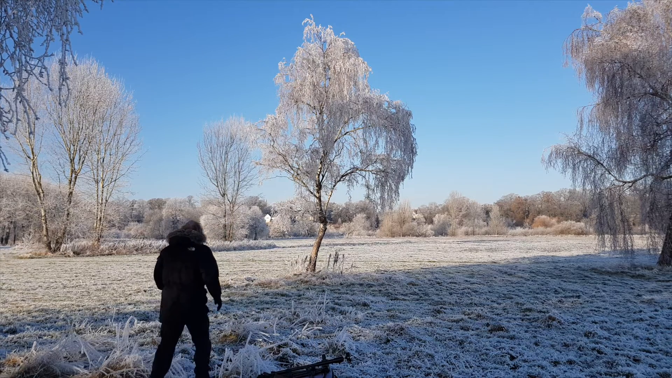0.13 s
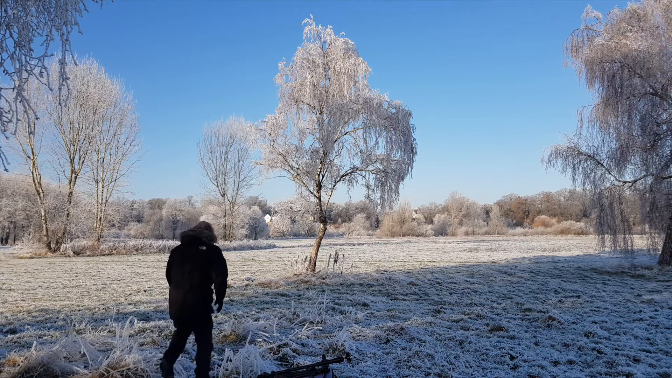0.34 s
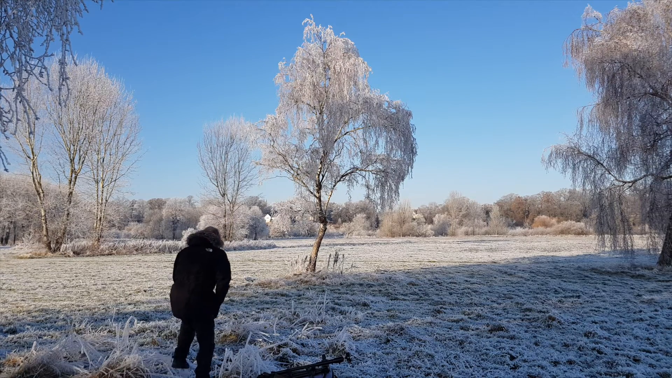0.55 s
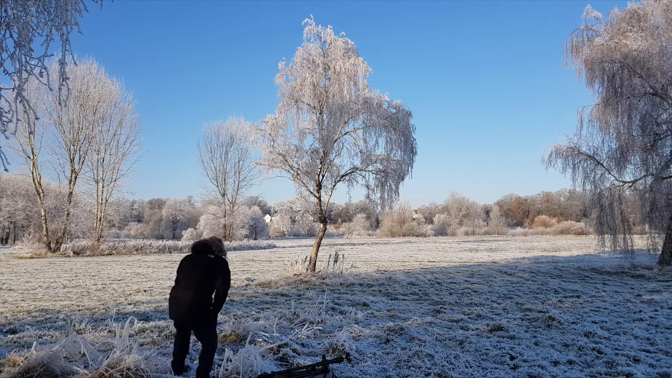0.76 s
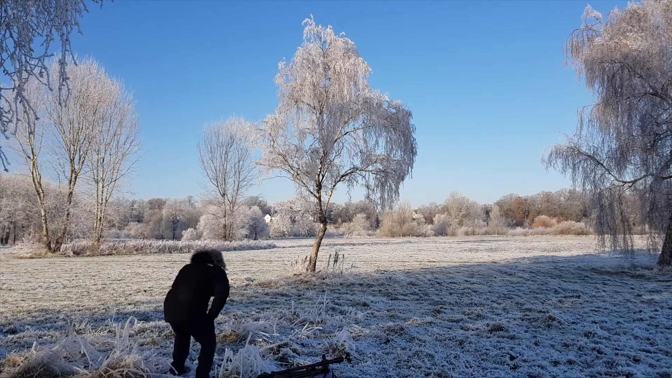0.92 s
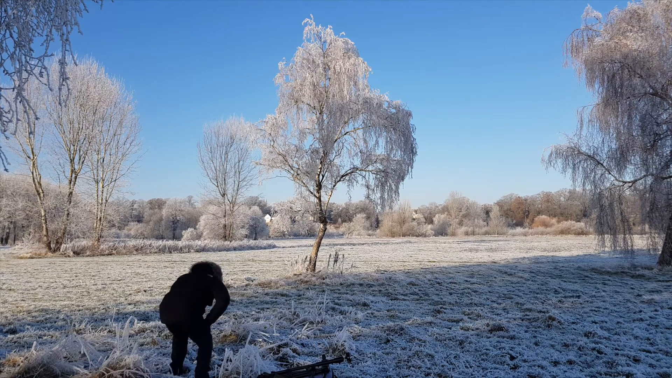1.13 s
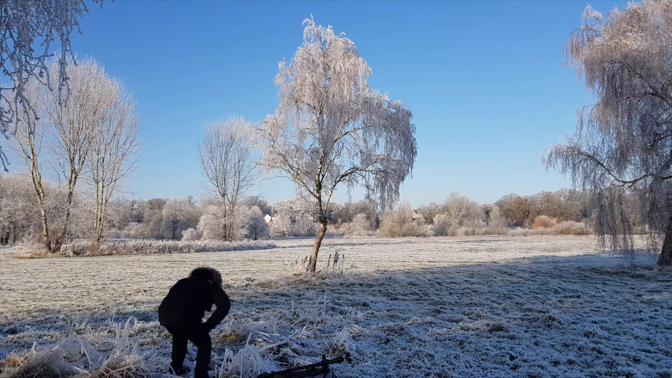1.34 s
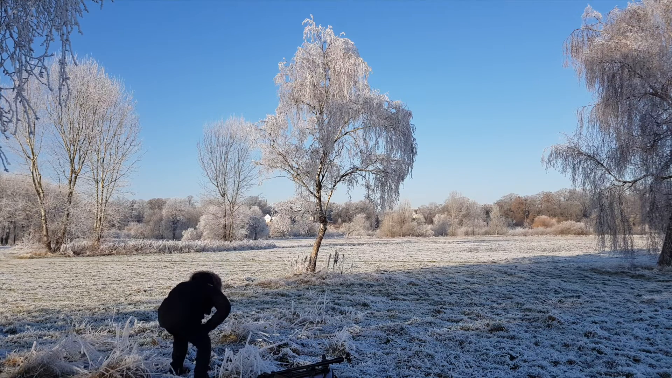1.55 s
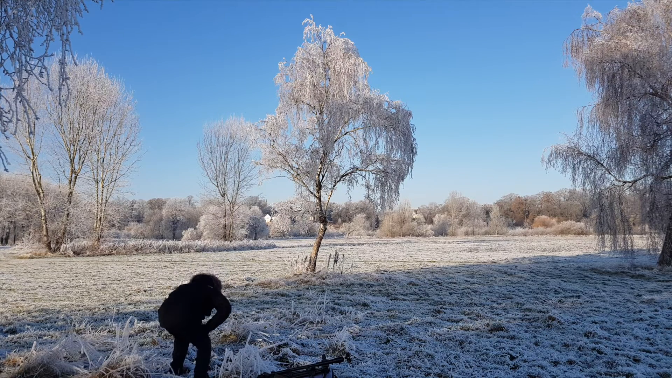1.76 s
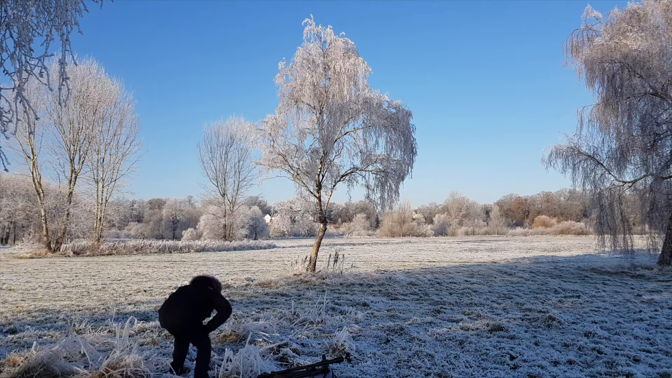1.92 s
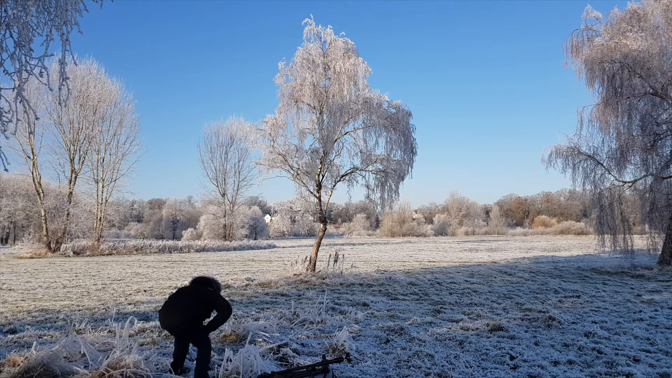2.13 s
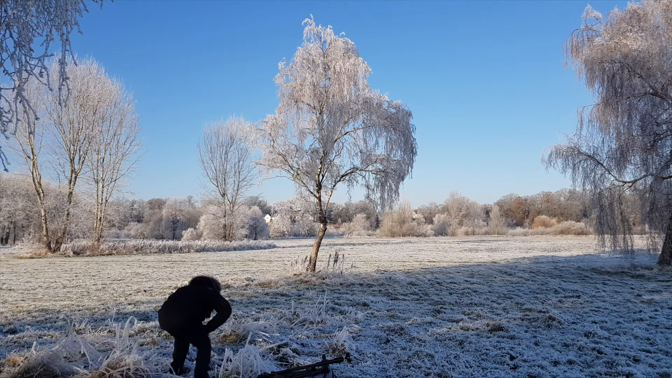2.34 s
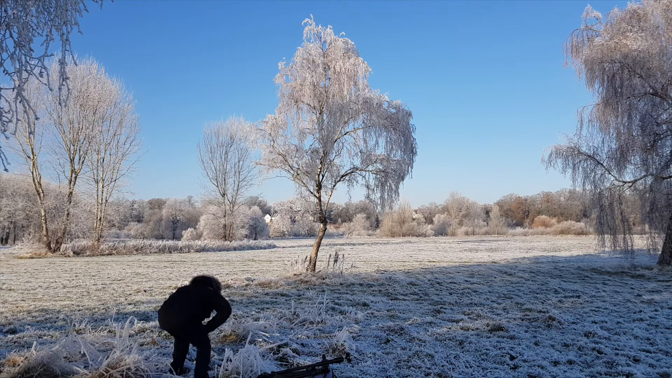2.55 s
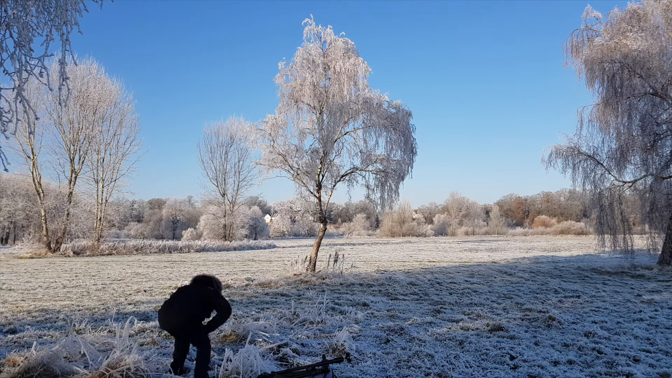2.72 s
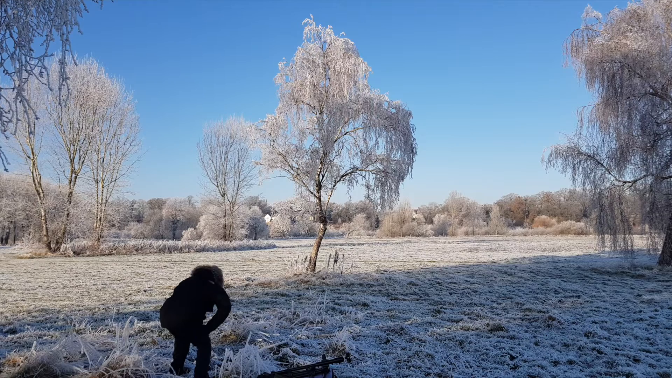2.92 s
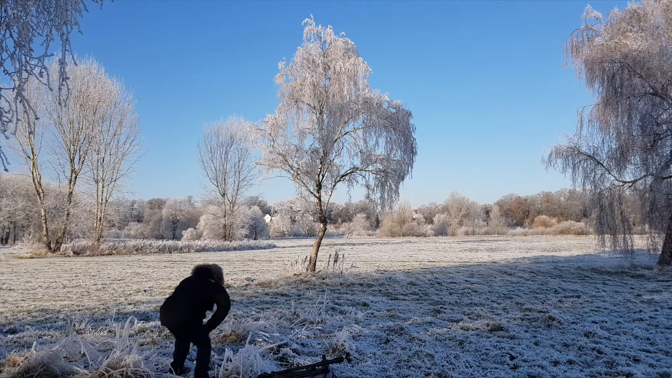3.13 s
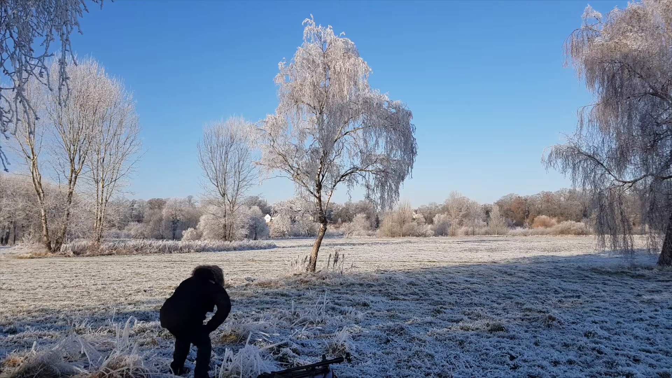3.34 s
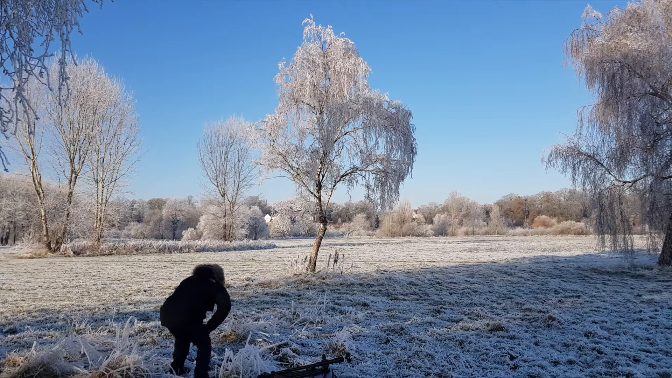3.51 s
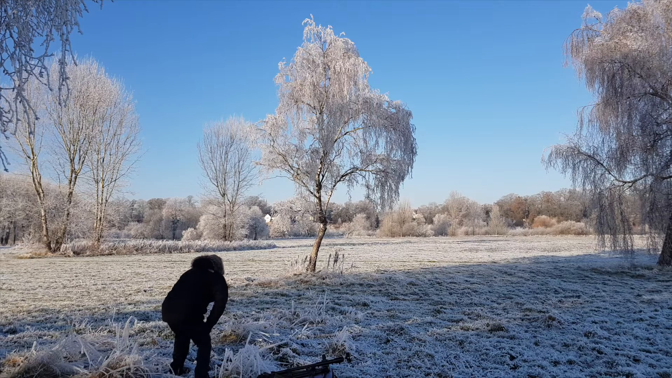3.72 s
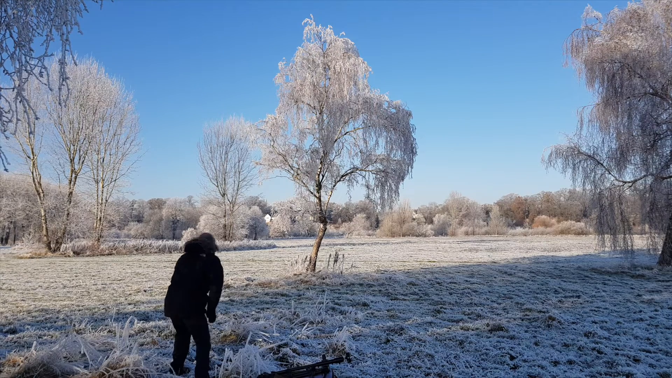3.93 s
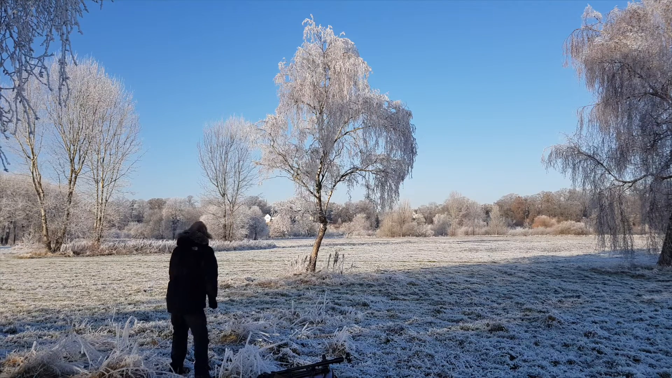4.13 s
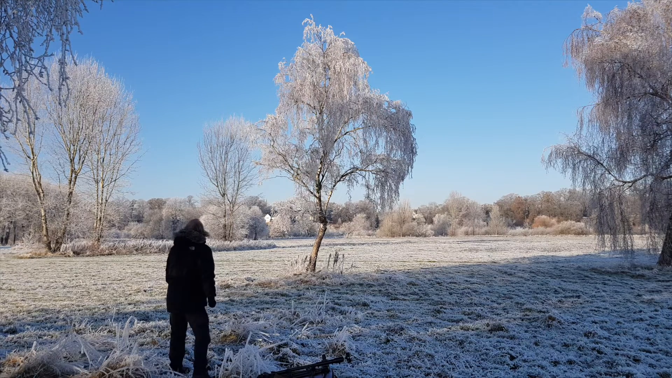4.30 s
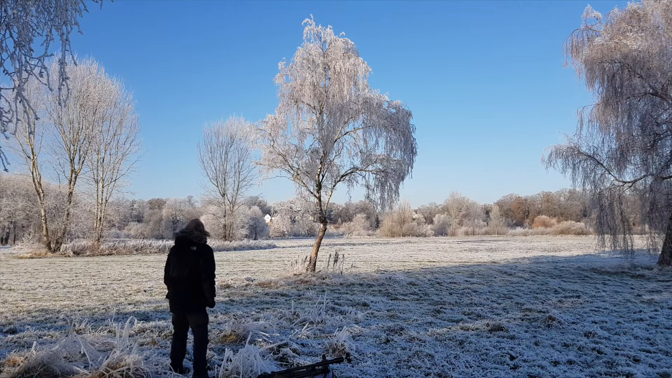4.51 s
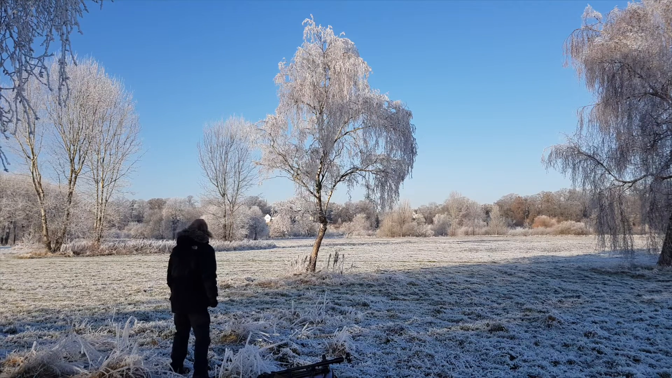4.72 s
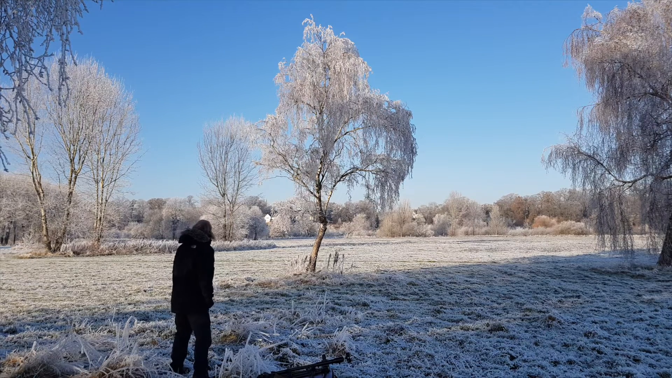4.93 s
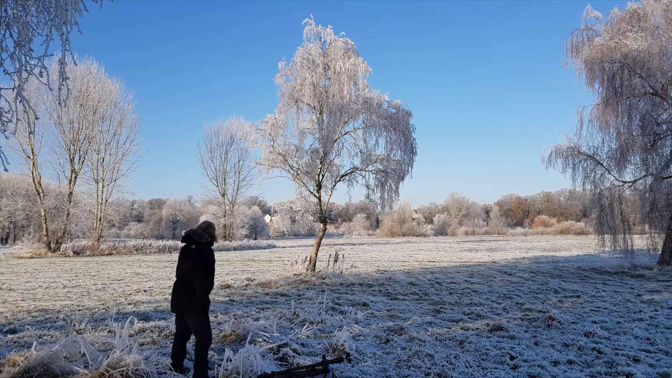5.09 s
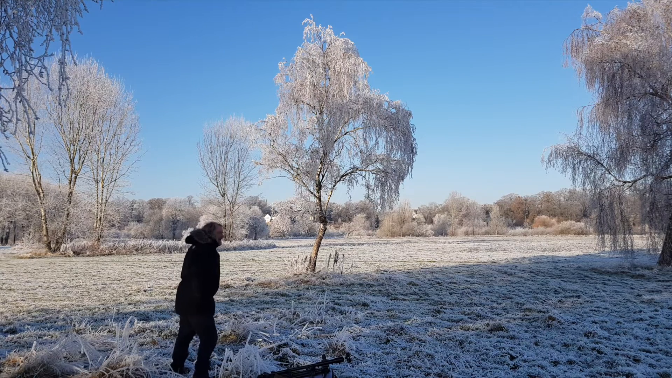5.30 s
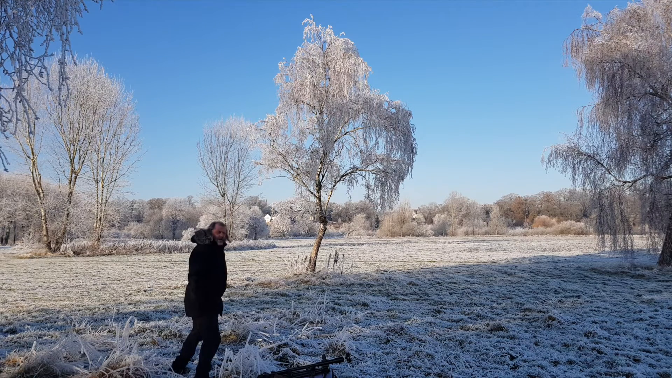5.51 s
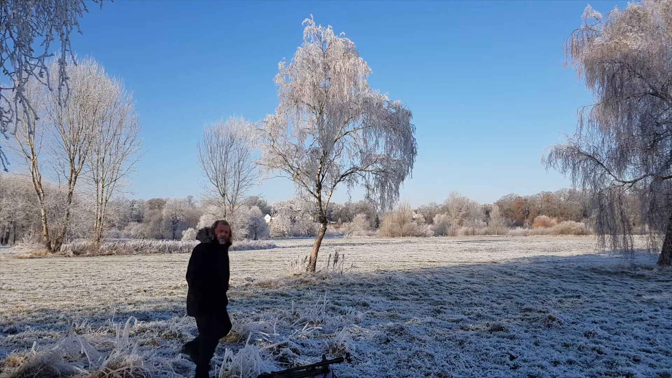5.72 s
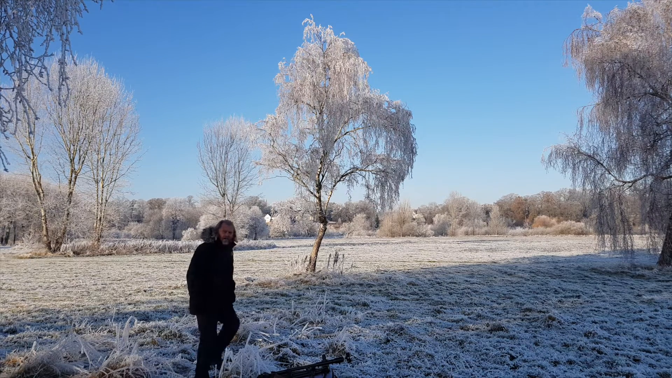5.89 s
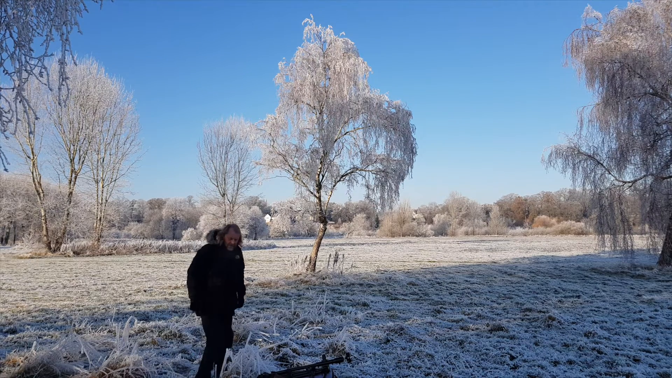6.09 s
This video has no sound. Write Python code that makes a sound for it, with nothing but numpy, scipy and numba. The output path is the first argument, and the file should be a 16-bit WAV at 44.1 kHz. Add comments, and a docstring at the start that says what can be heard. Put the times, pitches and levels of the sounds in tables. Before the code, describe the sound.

In an open frosty park, someone takes slow steps on frozen grass, already under way at the start. Bright brittle crackle, gritty crust crunch and single stalk snaps stop after about a second. A long pause holds faint ticking, low far traffic, a wavering engine and a soft bird whistle. A light scuff follows, then heavier steps ending on the sharpest crack. Close, dry phone pickup, with the background swelling around each crunch.

```python
"""A phone in an open park hears slow steps on frozen grass, already under way at the start: brittle blades
fracture, the crust below resonates, and single stalks crack. Far traffic and a thin hiss lie behind.
In the long pause the frost ticks, a far engine surfaces, a bird whistles and a coat brushes softly.
Two more bouts of steps follow, the last with the sharpest crack; the steps have no echo. A noise suppressor
opens at every crunch and slowly shuts again, so the background swells around the steps."""
import sys
import numpy as np
from scipy import signal
from scipy.fft import rfft, irfft
from scipy.io import wavfile
from scipy.ndimage import uniform_filter1d, minimum_filter1d, map_coordinates
from numba import njit

SR = 44100
rng = np.random.default_rng(int(sys.argv[2]) if len(sys.argv) > 2 else 0)


def dump_mix(stems):
    """Bounce the given channels to the path in sys.argv[1] as a 16-bit WAV at rate SR."""
    frames = np.atleast_2d(stems).T  # one column per channel
    limited = np.clip(frames, -1, 1)  # hard clip at full scale
    pcm = np.round(limited * 32767).astype(np.int16)
    wavfile.write(sys.argv[1], SR, pcm)


N = 271215
TIME = np.arange(N) / SR
FREQS = np.fft.rfftfreq(N, 1 / SR)
SIDES = np.array([[1], [-1]])  # left, right


def undb(db):
    """Logarithmic level: decibels become an amplitude gain."""
    return 10 ** (np.asarray(db) / 20)


def unit(x):
    """Normalization: the mean of the two channels gets unit rms."""
    return x / np.std(x.mean(axis=0))


def across(points):
    """Logarithmic frequency scale: (frequency [Hz], value) points are joined along it."""
    hz, value = np.transpose(points)
    return np.interp(np.log(FREQS + 1), np.log(hz), value)


def colour(x, spectrum):
    """Linear filtering: each frequency is weighted by its gain, and the result has unit level."""
    return unit(irfft(rfft(x) * undb(across(spectrum)), N))


def walk(rate):
    """Random modulation: Gaussian values, rate of them per second, joined by straight lines."""
    knots = rng.standard_normal(N)
    return np.interp(TIME * rate, np.arange(N), knots)


def swell(middle_s, width_s):
    """Gaussian envelope: a smooth rise and fall, 1 at its middle."""
    return np.exp(-.5 * ((TIME - middle_s) / width_s) ** 2)


def footsteps():
    """Successive failure under load: frost crystals shatter, blades snap, then the crust crunches."""
    # a sole pressing or scuffing the grass: (start [s], rise [s], length [s], release [dB/s],
    # crystals [dB], blades [dB], crust [dB], crust pitch [Hz], time to sink to the crust [s])
    sole_presses = [(-0.055, 0.11, 0.14, 200, -28, -39, -39.5, 3340, 0.026),
                    (0.131, 0.017, 0.048, 111, -38, -41, -46, 2320, 0.0078),
                    (0.239, 0.092, 0.11, 480, -73, -45, -53, 3960, 0.03),
                    (0.728, 0.022, 0.12, 330, -33, -42.5, -45, 3460, 0.033),
                    (0.784, 0.037, 0.046, 330, -50, -41, -44, 2160, 0.023),
                    (0.864, 0.14, 0.17, 296, -50, -44.5, -49, 3800, .01),
                    (4.161, 0.089, 0.15, 150, -34, -45, -56.5, 4670, 0.072),
                    (4.32, 0.053, 0.076, 300, -47, -47, -60, 4300, 0.011),
                    (4.411, 0.032, 0.045, 240, -49, -76, -90, 3700, .01),
                    (5.379, 0.038, 0.064, 150, -39, -44.5, -57, 3860, 0.014),
                    (5.417, 0.043, 0.18, 268, -39, -41, -43, 2100, 0.012),
                    (5.488, 0.022, 0.052, 216, -44.5, -60, -44, 2170, .012),
                    (5.911, 0.021, 0.041, 200, -50, -39, -49, 4000, 0.012),
                    (5.924, 0.045, 0.099, 35, -25, -30, -32, 2760, 0.015)]
    # spectrum of the frost crystals: (frequency [Hz], gain [dB])
    crystal_spectrum = [(1000, -65.5), (3500, -29.5), (6300, -8.5), (7300, 0), (9000, -1.5), (11000, -2.5),
                        (13500, -3.5), (15800, -9)]
    # spectrum of the grass blades: (frequency [Hz], gain [dB])
    blade_spectrum = [(300, -52.5), (3100, -17), (4200, 0.5), (6000, 3), (7800, 4.5), (9500, -6.5),
                      (12000, -10.5), (15800, -17.5)]
    # spectrum of the frozen crust: (frequency [Hz], gain [dB])
    crust_spectrum = [(100, -39), (1100, -12.5), (1900, 8), (2400, 4), (3500, 8.5), (5000, 5), (7000, -17),
                      (12000, -21)]
    crystals = crackle(crystal_spectrum, spread_db=1.2, ring_s=0.0001, tuft_depth=.8, count=30000)
    blades = crackle(blade_spectrum, spread_db=0.3, ring_s=0.00007, tuft_depth=.9, count=24000)
    crust = crackle(crust_spectrum, spread_db=1.2, ring_s=0.000097, tuft_depth=0.37, count=24000)
    lone_snaps = colour(shower(1.5, .00012, count=2500, order=48), crystal_spectrum)
    shatter = snap = crush = 0
    for start, rise, length, release, crystals_db, blades_db, crust_db, crust_hz, sink in sole_presses:
        lag = 0.12 * sink  # the blades give way after this share of the time to sink
        shatter = shatter + undb(crystals_db) * press(start, rise, length, release)
        snap = snap + undb(blades_db) * press(start + lag, rise, length - lag, release)
        crush_load = undb(crust_db) * press(start + sink, rise, length - sink, release)
        crush = crush + crush_load * crust_ring(crust, crust_hz)
    # lone snaps grow more slowly than the load, so they stand out most in light scuffs
    lone = undb(-19) * (shatter + snap) ** 0.93 * lone_snaps
    return crystals * shatter + blades * snap + crush + lone


def press(start, rise_s, length_s, release):
    """Loading and unloading: the load builds, sags while the foot stays down, then dies away faster."""
    sag_db_per_s = 27.5  # the crunch thins under the standing foot
    load = np.zeros(N)
    during = (TIME > start) & (TIME < start + 1)
    age = TIME[during] - start
    attack = np.sin(np.pi / 2 * np.minimum(age / rise_s, 1)) ** 2
    load[during] = attack * undb(-sag_db_per_s * age - release * np.maximum(age - length_s, 0))
    return load


def crust_ring(x, hz):
    """Resonance: the patch of crust under the sole rings in two broad modes."""
    width_hz, upper_ratio = 600, 1.68
    lower = signal.lfilter(*signal.iirpeak(hz, hz / width_hz, fs=SR), x)
    upper_hz = hz * upper_ratio
    upper = signal.lfilter(*signal.iirpeak(upper_hz, upper_hz / width_hz, fs=SR), x)
    return unit(x + undb(5) * (lower + undb(-7.5) * upper))


def crackle(spectrum, spread_db, ring_s, tuft_depth, count):
    """Superposed fractures: dry snaps come tuft by tuft; stiff, iced stems tinkle for milliseconds."""
    snaps = shower(spread_db, ring_s, count=count, order=48)
    tinkle = shower(2, .004, count=4000, order=600)
    grains = snaps * tufts(rate=70, fade_s=.006, depth=tuft_depth) + undb(-5) * tinkle
    hazy = scatter(grains, tail_s=.0028, tail_db=-4.5)
    return colour(hazy, spectrum)


def tufts(rate, fade_s, depth):
    """Shot noise: tufts give way at random; the crackle flares at once and decays exponentially."""
    breaks = (rng.random(N) < rate / SR) * rng.uniform(0.43, 1, N)
    flare = signal.lfilter([1], [1, -np.exp(-1 / (fade_s * SR))], breaks)
    return np.sqrt(1 + depth * flare)


def shower(spread_db, ring_s, count, order):
    """Random pulse train: fractures at random moments and pitches, their levels spread exponentially."""
    at, pitch, strength, place = rng.random((count, 4)).T
    at = at * TIME[-1]
    level_db = -spread_db * np.log(np.maximum(strength, .01))
    size = undb(level_db) * rng.choice([-1, 1], count)
    hz = 600 + pitch * 15400
    lag_s = port_lag(at) + 3e-5 * (place - .5)  # fractures lie spread around the foot
    return unit(pings(at, size, hz, ring_s, lag_s, order=order))


def pings(at, size, hz, ring_s, lag_s, order):
    """Damped oscillation: each fracture builds up, rings down and reaches the left port first."""
    out = np.zeros((2, N))
    index = (at * SR).astype(int)[:, None] + np.arange(order)  # order: samples per fracture
    for ear in range(2):
        age = np.maximum(np.arange(order) / SR - ear * lag_s[:, None], 0)
        fade = np.exp(-age / ring_s if np.ndim(ring_s) == 0 else -age / ring_s[:, None])
        envelope = fade * (1 - fade ** 10)
        wave = size[:, None] * envelope * np.sin(2 * np.pi * hz[:, None] * age)
        out[ear] = np.bincount(index.ravel(), wave.ravel(), N)[:N]
    return out


def port_lag(at):
    """Interaural-type time difference: delay [s] of the right port for a sound at the walker's feet."""
    # where the feet are, as the lead of the left port: (time [s], lead [s])
    bearing = [(0.1, 9.7e-5), (0.8, 0.00012), (4.3, 0.00011), (5.6, 0.000097), (5.95, 0.000082)]
    return np.interp(at, *np.transpose(bearing))


def scatter(x, tail_s, tail_db):
    """Diffuse scattering: turf spreads each fracture into a brief haze, different at each port."""
    keep = np.exp(-1 / (tail_s * SR))
    energy = signal.lfilter([1 - keep], [1, -keep], np.mean(x ** 2, axis=0) + 1e-18)
    return x + undb(tail_db) * np.sqrt(energy) * rng.standard_normal((2, N))


def patchy(x, patchy_db, width_hz, hold_s):
    """Time-varying spectrum: each tuft favours its own pitches, so narrow peaks come and go."""
    hz, t, frames = signal.stft(x, SR, nperseg=512)
    field = rng.standard_normal((200, 1200))  # random peaks over frequency and time
    grid = np.meshgrid(hz / width_hz, t / hold_s, indexing="ij")
    peaks = map_coordinates(field, grid, order=1, mode="mirror")
    gain = undb(patchy_db * peaks)
    gain = gain / np.sqrt(np.mean(gain ** 2))
    return signal.istft(frames * gain, SR)[1][:, :N]


def stalks():
    """Modal ringing: a lone frozen stalk snaps, knocks the crust, then splinters near the same pitch."""
    # single stalks breaking: (time [s], level [dB], pitch [Hz], ring [s], knock in the crust [dB])
    breaks = [(0.036, -27, 8600, .0004, -50), (0.0558, -19, 10400, .00034, -44),
              (0.1426, -20, 8200, .0005, -24.5), (0.2272, -31, 8600, .0005, -48),
              (0.317, -47, 7940, .0007, -44), (0.3413, -35, 7800, 0.0013, -48),
              (0.3503, -28.5, 8060, .0008, -53), (0.3586, -34, 8040, 0.00059, -55),
              (0.5823, -52, 8600, 0.00056, -68), (0.6185, -49, 8900, 0.00076, -64),
              (0.7504, -20, 7900, 0.0006, -54), (0.7678, -18, 8300, 0.00089, -31),
              (0.841, -21, 8300, 0.00059, -39), (0.8547, -23, 8000, .0008, -42),
              (0.978, -27, 8000, .0007, -52), (1.0279, -37, 7600, .0007, -50),
              (1.0994, -43, 9000, .0008, -66), (1.193, -41, 8300, 0.0013, -61),
              (2.105, -50, 7830, .0016, -80), (3.6666, -42.5, 7500, 0.0022, -74.5),
              (3.674, -47, 7230, 0.0096, -76), (4.067, -38.5, 7700, 0.0027, -68),
              (4.2003, -28, 8100, .0012, -66), (4.3246, -26, 9000, .0005, -60),
              (4.3595, -27, 9500, .0004, -60), (4.3787, -30, 3970, 0.0018, -50),
              (4.4129, -31, 10400, .0005, -61), (5.335, -52, 7800, 0.0049, -82.5),
              (5.375, -41, 7800, 0.008, -76), (5.4012, -23, 8450, 0.0011, -58),
              (5.4156, -22, 8100, .0006, -39), (5.457, -20, 8400, .0006, -30),
              (5.4702, -30, 9500, .0005, -21), (5.509, -19, 8400, 0.00054, -14.5),
              (5.5258, -29, 9100, .0005, -27), (5.532, -29, 9000, .0005, -24),
              (5.5498, -18, 10000, .0006, -28), (5.6027, -27, 9400, .0005, -39),
              (5.8294, -43, 9800, .001, -70), (5.8523, -35, 8100, 0.00094, -72),
              (5.9205, -25, 7600, .0007, -60), (5.957, -6, 7200, 0.00058, -28),
              (5.9836, -19, 9200, .00045, -29), (6.0073, -14, 5600, 0.00052, -23)]
    # what a stalk rings with: (pitch ratio, level [dB])
    stalk_modes = [(0.8, -8), (1, 0), (1.14, -12.5), (1.45, -18)]
    # what the crust knocks with: (frequency before random detuning [Hz], level [dB])
    knock_modes = [(2000, -8), (2350, -6), (3400, -6)]
    splinter_count, splinter_span_s = 5, 0.0085
    at, db, hz, ring_s, knock_db = np.transpose(breaks)
    lag = port_lag(at)
    snap = knock = splinters = 0
    for ratio, mode_db in stalk_modes:
        snap = snap + pings(at, undb(db + mode_db), hz * ratio, ring_s, lag, order=800)
    for mode_hz, mode_db in knock_modes:
        knock_hz = mode_hz * (1 + .06 * rng.standard_normal(len(at)))
        knock = knock + pings(at, undb(knock_db + mode_db), knock_hz, 0.00067, lag, order=256)
    for delay, detune in rng.random((splinter_count, 2, len(at))):
        size = undb(db - 5.9 * delay)  # later splinters are weaker
        splinter_hz = hz * (1 + 0.24 * (detune - .5))
        late = at + splinter_span_s * delay
        splinters = splinters + pings(late, size, splinter_hz, ring_s, lag, order=800)
    return snap + scatter(knock, tail_s=0.0024, tail_db=-16) + undb(-13) * splinters


def rustle():
    """Addition of powers: trodden frost ticks on faintly, more so while the walker shifts and bends."""
    # the walker shifts weight, bends or straightens: (middle [s], half width [s], level [dB])
    shifts = [(0.66, 0.15, -56), (1.098, 0.27, -61), (1.97, 0.15, -68.5), (2.771, 0.057, -69),
              (3.68, 0.05, -65.5), (3.85, 0.14, -70.5), (4.09, 0.073, -64), (4.19, 0.083, -62),
              (4.58, 0.21, -67), (5.368, 0.1, -62), (5.82, 0.079, -64)]
    # spectrum of the ticking frost: (frequency [Hz], gain [dB])
    litter_spectrum = [(1200, -15), (2800, -8), (4200, -6.5), (6000, -1), (7800, 2.5), (9500, -4),
                       (12000, -1), (15800, -8.5)]
    power = undb(-79.5) ** 2  # ticking while the walker stands still
    for middle, width, db in shifts:
        power = power + (undb(db) * swell(middle, width)) ** 2
    ticks = crackle(litter_spectrum, spread_db=-1.0, ring_s=0.00044, tuft_depth=1.4, count=28000)
    return np.sqrt(power) * ticks


def coat():
    """Friction noise: the coat brushes softly as the walker straightens up."""
    # the brush: (middle [s], half width [s], level [dB])
    brush = (3.96, 0.074, -69)
    # spectrum of the cloth: (frequency [Hz], gain [dB])
    cloth_spectrum = [(1000, -17), (2200, -1), (3300, 0), (5000, -7), (12000, -18)]
    middle, width, db = brush
    return undb(db) * swell(middle, width) * colour(rng.standard_normal((2, N)), cloth_spectrum)


def bird():
    """Frequency glides and scattering: one falling whistle and a rising pair, blurred by branches."""
    # whistles of a far bird: (middle [s], half width [s], level [dB], pitch [Hz], glide [octaves/s])
    whistles = [(2.235, 0.065, -71, 2930, -1.6), (3.87, .03, -74, 3150, 0.57),
                (3.98, .026, -70, 3320, 0.085)]
    echo_fade_s = 0.014  # fading of the echoes among the trees
    waver = 1 + .009 * walk(150)
    song = 0
    for middle, width, db, hz, glide in whistles:
        pitch = hz * waver * 2 ** np.clip(glide * (TIME - middle), -1, 1)
        song = song + undb(db) * swell(middle, width) * np.sin(2 * np.pi * np.cumsum(pitch) / SR)
    age = TIME[:SR // 4]
    echoes = rng.standard_normal((2, len(age))) * np.exp(-age / echo_fade_s)
    branches = echoes * np.sqrt(2 / (echo_fade_s * SR))  # near unit energy
    return signal.fftconvolve(song[None], branches, axes=1)[:, :N]


def background():
    """Spatial coherence: far traffic is alike at both ports only in the bass; a thin hiss lies on top."""
    # likeness of the hum at the two ports: (frequency [Hz], correlation)
    port_likeness = [(60, 1), (130, 0.9), (290, 0.88), (640, 0.11), (950, -0.11), (1400, 0.047),
                     (3000, 0.17)]
    # spectrum of the traffic hum: (frequency [Hz], gain [dB])
    hum_spectrum = [(18, -56.5), (30, -41.5), (50, -17), (90, -13.5), (135, -10.5), (240, -12.5),
                    (330, -7.5), (500, -4.5), (640, -5.5), (820, -6), (1570, -22), (2060, -38), (2700, -52),
                    (5000, -110)]
    # spectrum of the hiss: (frequency [Hz], gain [dB])
    hiss_spectrum = [(1500, -7.5), (2500, 8), (4000, 3), (6500, -1), (8500, -4), (12000, 6), (15800, 1.5)]
    # far traffic, slowly growing, then easing at the end: (time [s], level [dB])
    traffic = [(0, -41.5), (.5, -41.5), (1.0, -41.5), (1.75, -41), (3.15, -39.5), (4.5, -39.5),
               (4.85, -39.5), (5.2, -39), (5.6, -38.5), (6.15, -41)]
    likeness = np.clip(across(port_likeness), -.99, .99)
    mid, side = rfft(rng.standard_normal((2, N)))
    air = irfft(mid * np.sqrt(1 + likeness) + SIDES * side * np.sqrt(1 - likeness), N)
    hum = colour(air, hum_spectrum) * undb(0.25 * walk(7.4))
    hiss = colour(rng.standard_normal((2, N)), hiss_spectrum)
    level = undb(np.interp(TIME, *np.transpose(traffic)))
    return level * (hum + drone() + undb(-29.0) * hiss)


def drone():
    """Frequency and amplitude modulation: a far engine's tone wavers in and out of the traffic hum."""
    # the engine surfacing: (middle [s], half width [s], level against the hum [dB], pitch [Hz])
    surfacings = [(1.95, 0.11, -9.5, 177), (2.5, 0.26, -14.5, 145.8), (4.8, 0.1, -12, 174),
                  (5.27, 0.075, -10, 196), (5.5, 0.13, -14, 171), (5.85, 0.15, -18.5, 183)]
    waver = 1 + 0.01226 * walk(15)
    tone = 0
    for middle, width, db, hz in surfacings:
        tone = tone + undb(db) * swell(middle, width) * np.sin(2 * np.pi * np.cumsum(hz * waver) / SR)
    return np.sqrt(2) * tone * undb(3.2 * walk(17))


def scene():
    """Superposition: steps, stalks and rustle stand in front of the open park."""
    frost = patchy(footsteps() + rustle(), patchy_db=3.3, width_hz=110, hold_s=.032)
    return frost + stalks() + coat() + background() + bird()


@njit
def follow(wanted, attack, release):
    """Asymmetric smoothing: glide up towards the wanted opening, slide down in steps of limited size."""
    out, now = np.empty(len(wanted)), wanted[0]
    for i in range(len(wanted)):
        now += max((wanted[i] - now) * attack, -release)
        out[i] = now
    return out


def suppress(x):
    """Downward expansion: everything is turned down while there is no crunch in the treble."""
    listen_hz, open_above_db, knee_db, shut_db = 3010, -52, 11, -8
    open_s, hold_s, shut_s = 0.069, 0.2, 0.54  # opens quickly, holds, then shuts at a steady rate
    treble = signal.sosfilt(signal.butter(4, listen_hz, "high", fs=SR, output="sos"), x)
    power = np.abs(uniform_filter1d(np.mean(treble ** 2, axis=0), size=2000))
    db = 10 * np.log10(power + 1e-18)
    wanted = np.clip((db - open_above_db) / knee_db, 0, 1)
    hold = int(hold_s * SR)
    held = -minimum_filter1d(-wanted, hold, origin=(hold - 1) // 2)  # running maximum
    opening = follow(held, 1 / (open_s * SR), 1 / (shut_s * SR))
    return x * undb(shut_db * (1 - opening))


def record(dry):
    """Transfer functions: each port colours the sound, the suppressor ducks pauses, the top is cut."""
    # colour of the two ports: (frequency [Hz], left minus right [dB])
    port_colour = [(60, 0.5), (200, -2), (700, -4), (1300, -5.5), (1900, -7.5), (2900, -2.5), (4100, -3.5),
                   (5500, -4), (7000, -4.5), (8200, 0), (9300, 4), (12000, 1), (15000, 0)]
    notch_hz, notch_width_hz, notch_db = 7300, 1200, -14  # hollow in the left port's response
    top_hz = 15800
    detune = notch_hz ** 2 - FREQS ** 2
    damping = 1j * FREQS * notch_width_hz
    notch = (detune + undb(notch_db) * damping) / (detune + damping)
    ports = undb(SIDES * across(port_colour) / 2) * np.array([notch, np.ones(len(FREQS))])
    heard = irfft(rfft(dry) * ports, N)
    low_pass = 1 / (1 + (FREQS / top_hz) ** 600)  # very steep
    return irfft(rfft(suppress(heard)) * low_pass, N)


dry = scene()
out = record(dry)
dump_mix(out)
```